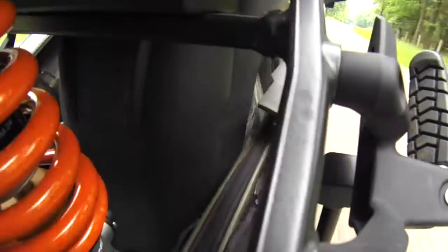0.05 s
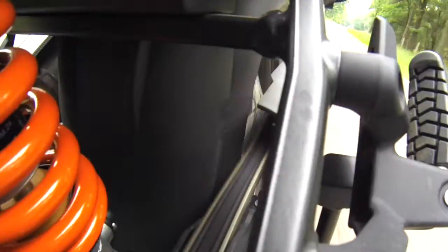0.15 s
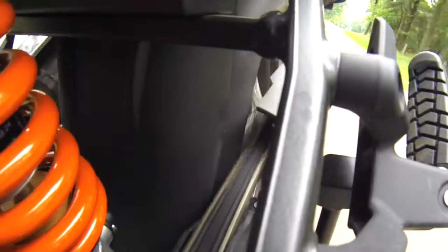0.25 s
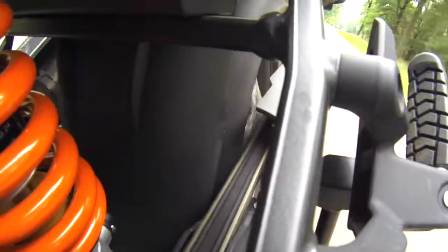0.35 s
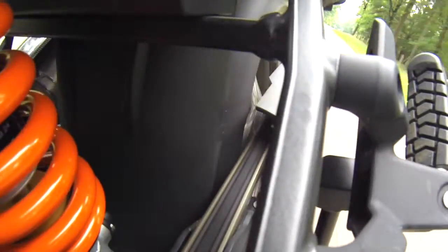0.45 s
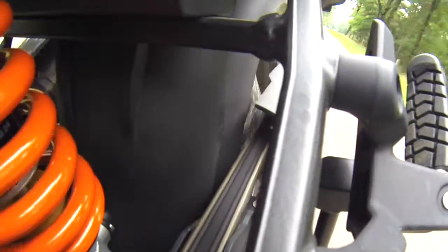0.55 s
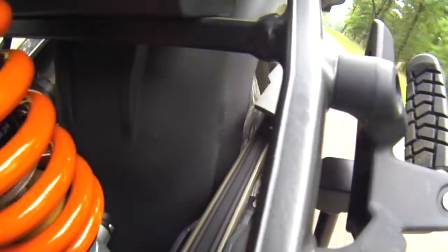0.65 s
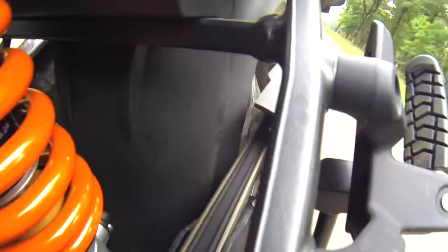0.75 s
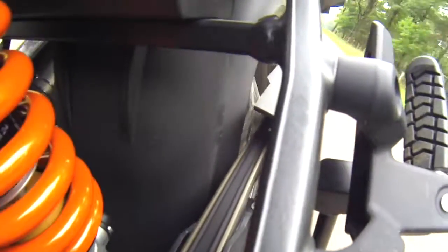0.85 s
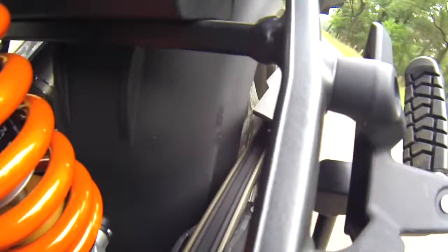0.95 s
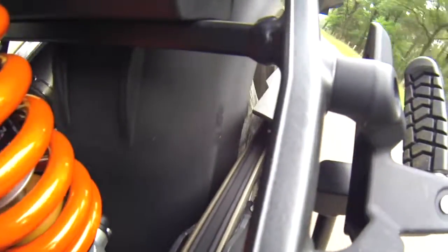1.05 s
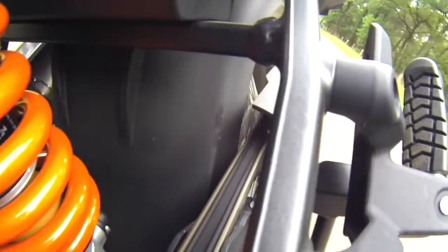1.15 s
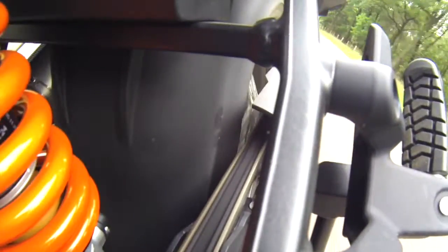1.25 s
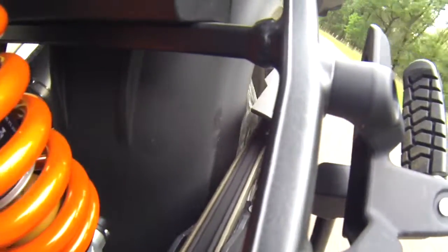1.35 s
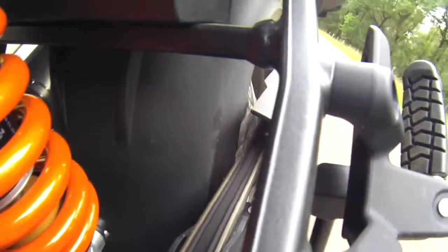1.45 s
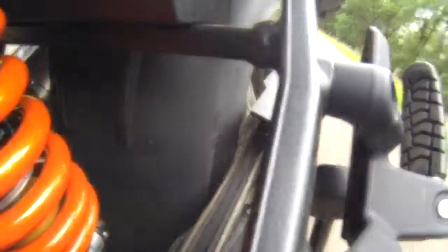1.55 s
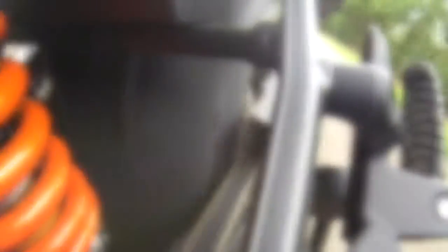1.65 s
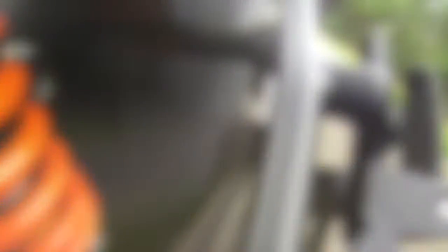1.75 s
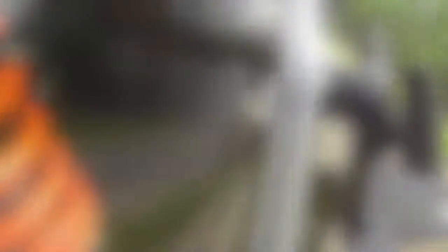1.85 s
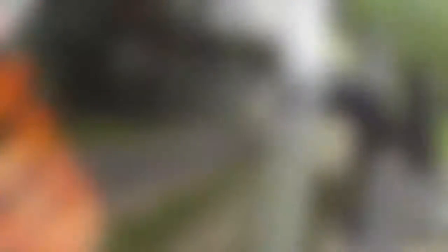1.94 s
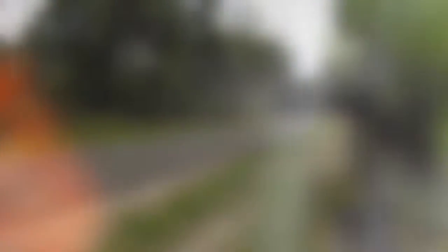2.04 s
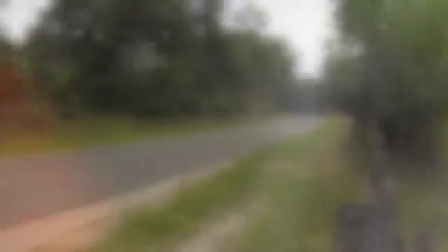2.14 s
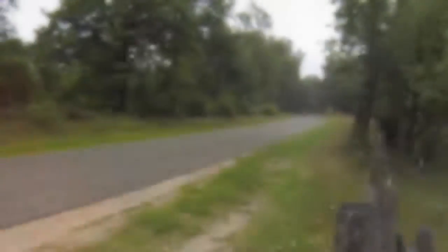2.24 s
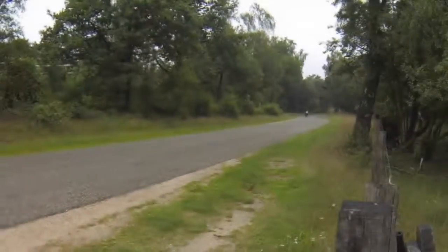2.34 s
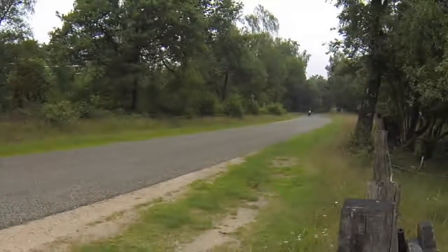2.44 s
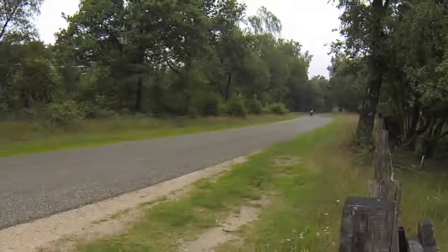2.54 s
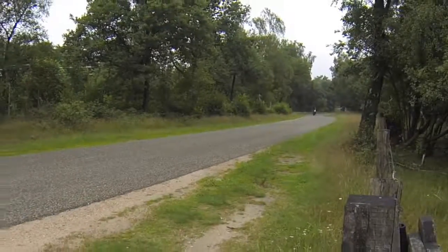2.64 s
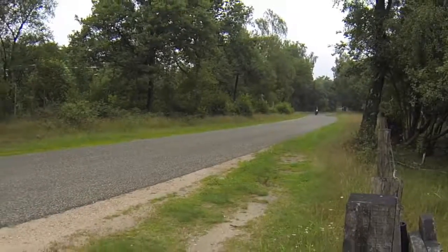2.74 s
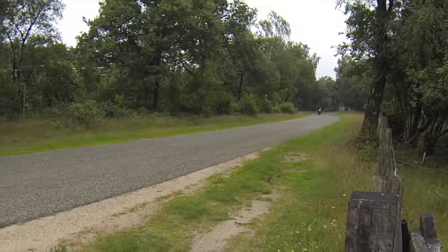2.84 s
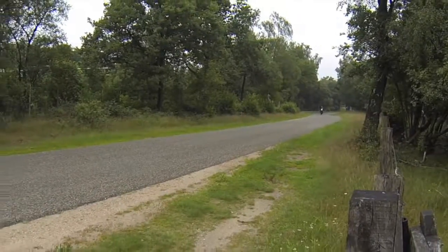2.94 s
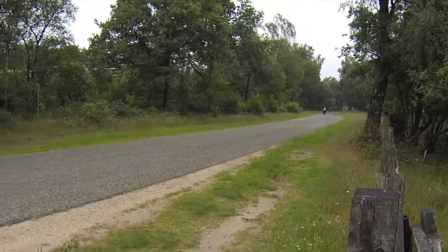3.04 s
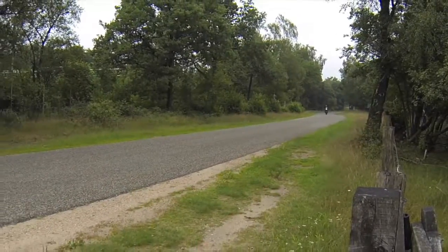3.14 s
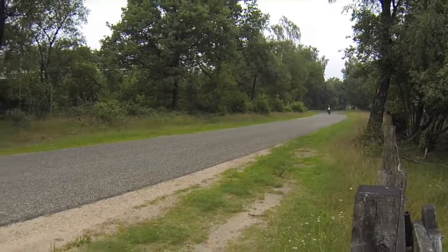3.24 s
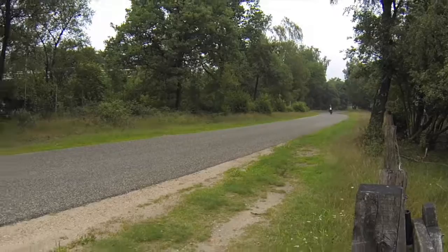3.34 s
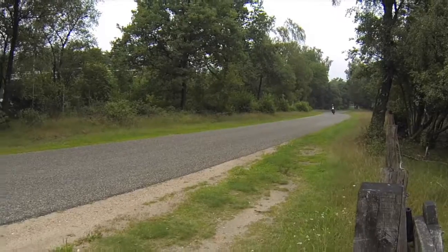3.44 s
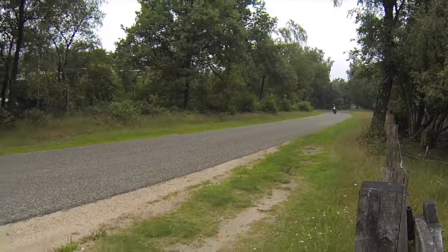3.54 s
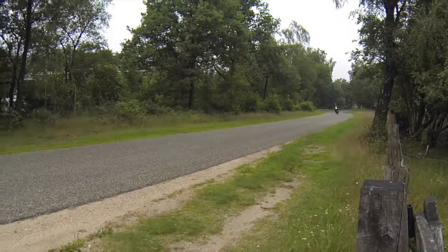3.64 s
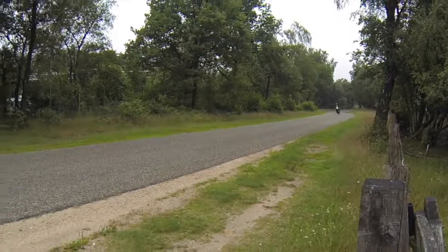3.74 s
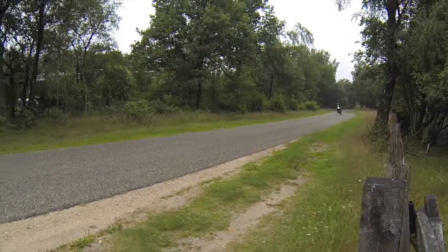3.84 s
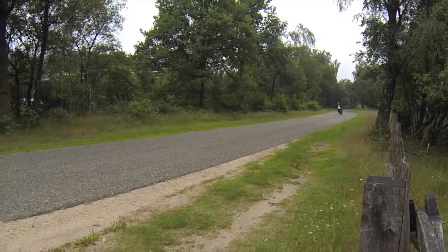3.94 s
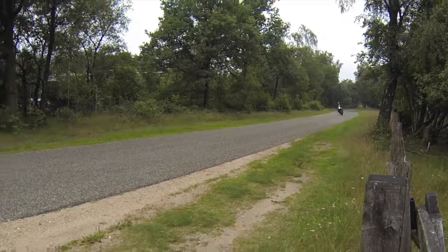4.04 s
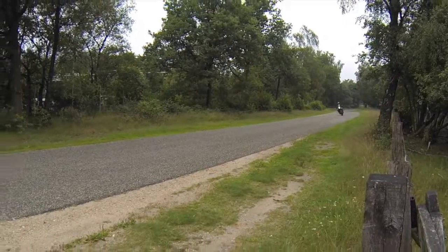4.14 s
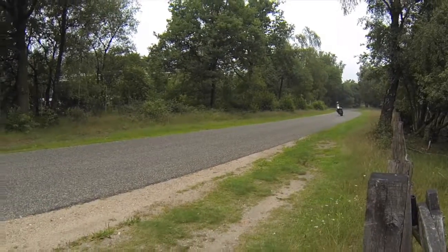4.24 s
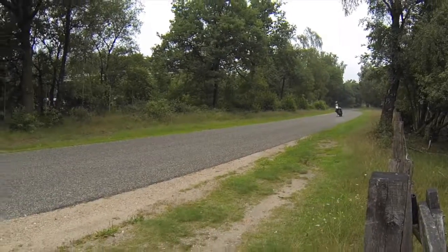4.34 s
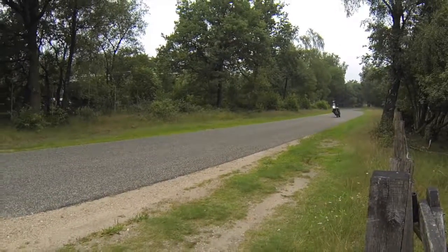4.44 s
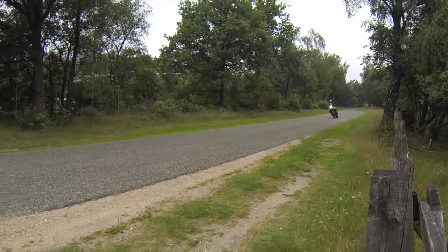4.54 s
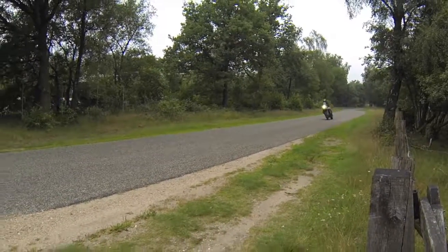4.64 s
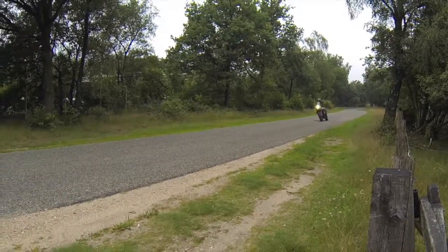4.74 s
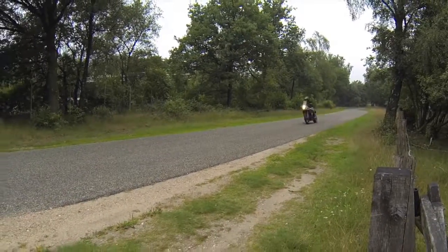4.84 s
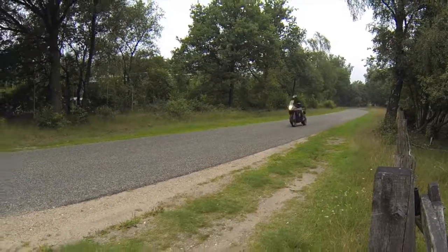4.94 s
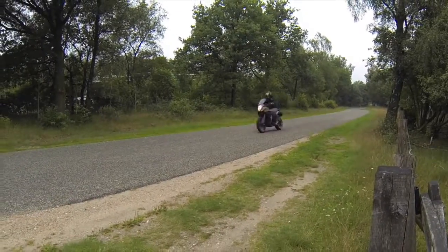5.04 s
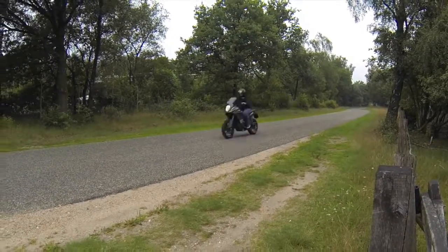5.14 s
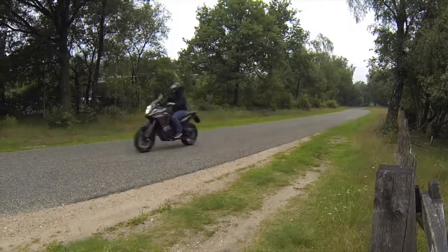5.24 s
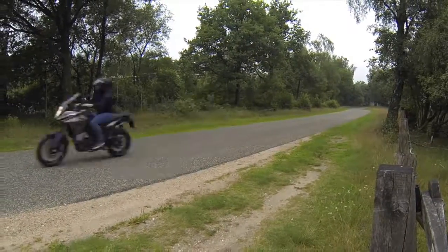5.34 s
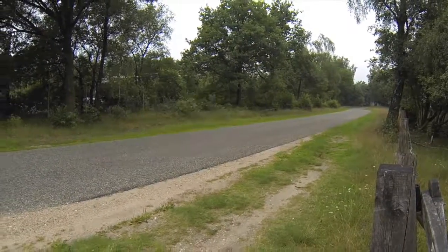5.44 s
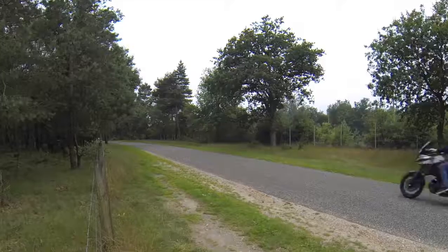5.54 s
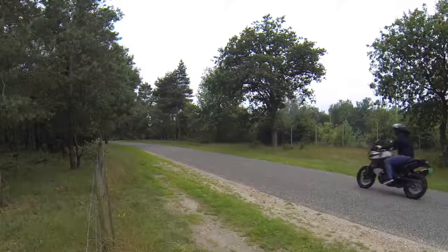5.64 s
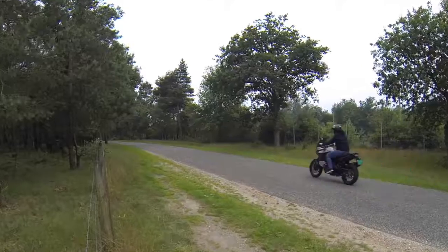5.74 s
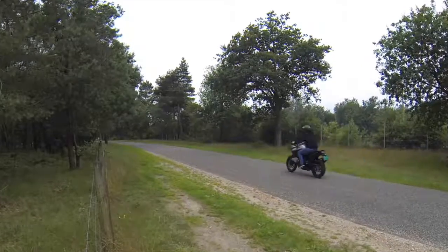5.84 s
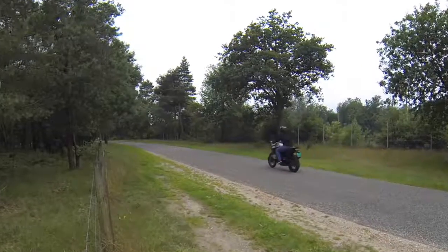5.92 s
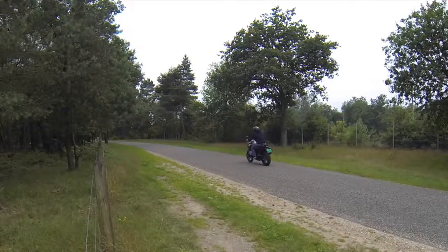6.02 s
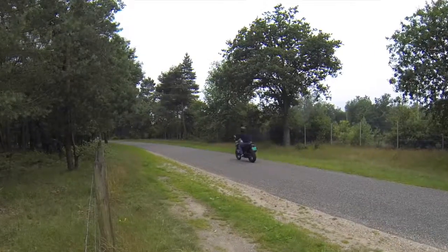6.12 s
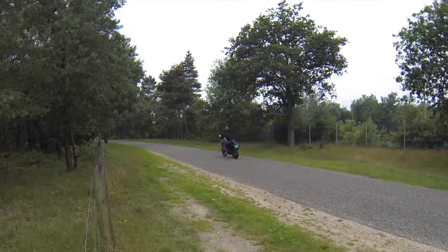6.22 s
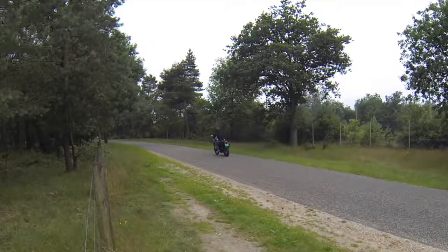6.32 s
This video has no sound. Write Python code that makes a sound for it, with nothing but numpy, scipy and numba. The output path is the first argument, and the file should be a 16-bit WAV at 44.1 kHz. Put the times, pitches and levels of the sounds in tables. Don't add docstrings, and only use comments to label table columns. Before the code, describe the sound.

A motorcycle throbs roughly close by, fades under brief bird whistles, then roars past on a road and recedes in even pulses.

```python
import sys
import numpy as np
from scipy import signal
from scipy.fft import rfft, irfft
from scipy.io import wavfile
from scipy.ndimage import uniform_filter1d, map_coordinates
from numba import njit

SR = 44100
rng = np.random.default_rng(int(sys.argv[2]) if len(sys.argv) > 2 else 0)


def waveform_to_disk(signal):
    frames = np.transpose(np.atleast_2d(signal))
    scaled = np.clip(frames, -1, 1) * 32767
    samples = np.round(scaled).astype(np.int16)
    wavfile.write(sys.argv[1], SR, samples)


def field_ratio(decibels):
    return 10 ** (np.asarray(decibels, dtype=float) / 20)


N = 281358
TIME = np.arange(N) / SR


def curve(table):
    s, *columns = np.transpose(table)
    return [np.interp(TIME, s, c) for c in columns]


def ramp(start_s, end_s):
    return np.clip((TIME - start_s) / (end_s - start_s), 0, 1)


def unit(x):
    return x / np.sqrt(np.mean(x ** 2))


def noise(colour, source=None):
    hz, db = np.transpose(colour)
    bins_hz = np.arange(1, N // 2 + 2) * SR / N
    gain = field_ratio(np.interp(np.log(bins_hz), np.log(hz), db, left=-90, right=-90))
    white = rng.standard_normal(N) if source is None else source
    return unit(irfft(rfft(white) * gain, N))


def walk(rate_hz):
    hold = int(SR / rate_hz)
    steps = np.repeat(rng.standard_normal(N // hold + 1), hold)
    return uniform_filter1d(uniform_filter1d(steps, hold), hold)[:N]


@njit
def svf(x, hz, width_hz):
    y, band, low = np.empty(len(x)), 0., 0.
    for i in range(len(x)):
        g, k = np.tan(np.pi * hz[i] / SR), width_hz / hz[i]
        v = (band + g * (x[i] - low)) / (1 + g * (g + k))
        band, low, y[i] = 2 * v - band, low + 2 * g * v, k * v
    return y


def resonance(x, hz, width_hz):
    return svf(x, np.full(len(x), 1. * hz), 1. * width_hz)


def highpass(x, hz):
    return signal.sosfilt(signal.butter(2, hz, "high", fs=SR, output="sos"), x)


def distance_db(abreast_s):
    speed_m_s, kerb_m = 29.95, 6.43
    return -20 * np.log10(np.hypot(speed_m_s * (TIME - abreast_s), kerb_m) / kerb_m)


def layer_db(layers, near_db):
    return [10 * np.log10(field_ratio(db + pace * near_db) ** 2 + field_ratio(wash_db) ** 2) for db, pace, wash_db in layers]


def bumps_db(rows):
    return sum(db * np.exp(-((TIME - s) / length_s) ** 2) for s, db, length_s in rows)


def bird():
    # (time [s], length [s], from [Hz], to [Hz], level [dB])
    notes_sung = [
        (2.338, 0.048, 3310, 2880, -46),
        (2.398, 0.048, 2870, 3180, -47.5),
        (2.44, .06, 3170, 3150, -61),
        (2.528, .012, 4850, 4350, -55),
        (2.552, 0.033, 4080, 3460, -47),
        (2.578, .03, 3500, 3210, -52),
        (2.609, 0.028, 3340, 3265, -47),
        (2.63, .035, 3360, 3420, -57),
    ]
    out = np.zeros(N)
    for s, length_s, from_hz, to_hz, db in notes_sung:
        along = ramp(s, s + length_s)
        swell = np.abs(np.sin(np.pi * along)) ** 0.67 * (along < 1)
        phase = 2 * np.pi * np.cumsum(from_hz + (to_hz - from_hz) * along) / SR
        out += np.sqrt(2) * field_ratio(db) * swell * np.sin(phase)
    tail = rng.standard_normal(SR // 6) * np.exp(-TIME[:SR // 6] / 0.063)
    return out + field_ratio(-33) * signal.fftconvolve(out, tail)[:N]


def ticks():
    # (time [s], peak level [dB], centre [Hz])
    strikes = [(5.1971, -32, 8660), (5.2294, -33, 8680), (5.2515, -30, 8600), (5.2764, -33, 8550),
               (5.3218, -26, 9450), (5.3457, -24, 8970), (5.3931, -24, 9830), (5.433, -22, 8550),
               (5.441, -25, 9570), (5.4644, -28, 8620), (5.5039, -38, 9670), (5.5154, -34, 9180),
               (5.5394, -35, 9140), (5.5844, -35, 8910), (5.6431, -34, 9430)]
    out, t = np.zeros(N), TIME[:300]
    for s, db, hz in strikes:
        grain = rng.standard_normal(300) * t * np.exp(-t / 0.0014)
        burst = resonance(resonance(grain, hz, 4000), hz, 4000)
        start = int(s * SR)
        out[start:start + 300] += field_ratio(db) * burst / np.abs(burst).max()
    return out


def clatter(turns, repeat, life):
    pattern = rng.standard_normal((300, 1024))
    age, place = turns / life % 299, (turns % 1 * 1024).astype(int)
    row, blend = age.astype(int), np.pi / 2 * (age % 1)
    same = np.cos(blend) * pattern[row, place] + np.sin(blend) * pattern[row + 1, place]
    return np.sqrt(repeat) * same + np.sqrt(1 - repeat) * rng.standard_normal(N)


def pipe_wave(orders, second, gap, lean, bass_lag, size=2048):
    k, db = np.transpose(orders)
    lines = np.arange(size // 2 + 1)
    roll_db = db[-1] - 40 * np.log2(np.maximum(lines / k[-1], 1))
    line_db = np.where(lines > k[-1], roll_db, np.interp(lines, k, db))
    log_gain = np.log(field_ratio(line_db) + 1e-6)
    cepstrum = irfft(log_gain)
    cepstrum[1:size // 2] *= 2
    cepstrum[size // 4:] = 0
    pair = np.angle(1 + second * np.exp(-2j * np.pi * lines * gap))
    pair = pair - 2 * np.pi * lines * bass_lag * (lines < 3)
    phase = rfft(cepstrum).imag + pair + lean
    return unit(-irfft(np.exp(log_gain + 1j * phase) * (lines > 0)))


def engine(revs, levels, pipes, turn_s, roar, hiss, second, lean, jitter, scatter_db, gate, start, repeat,
           flicker_db, bass_lag=0):
    # (frequency [Hz], level [dB per Hz])
    rumble = [(15, -21), (30, 3), (80, 4.5), (160, -3.5), (300, -7), (450, -25.5)]
    exhaust_db, rumble_db, roar_db, hiss_db = levels
    even = np.cumsum(curve(revs)[0]) / SR
    even = even - even[int(revs[0][0] * SR)] + start
    turns = even + jitter * walk(30)
    strength = np.interp(turns, np.arange(400) + 0.75, field_ratio(scatter_db * rng.standard_normal(400)))

    waves = np.array([pipe_wave(p, second, gap=.6, lean=lean, bass_lag=bass_lag) for p in pipes])
    voice = np.interp(TIME, turn_s, range(len(pipes)))
    exhaust = map_coordinates(waves, [voice, turns % 1 * 2048], order=1, mode="grid-wrap")

    puff = unit(np.exp(gate * strength * np.cos(2 * np.pi * (turns - .15))))
    rattle = puff * clatter(even, repeat, life=6.034)
    low = field_ratio(exhaust_db) * strength * exhaust + field_ratio(rumble_db + 1.13 * walk(10)) * noise(rumble)
    mid = field_ratio(roar_db + 0.38 * walk(12)) * noise(roar, rattle)
    high = field_ratio(hiss_db + 0.067 * walk(5)) * noise(hiss, rattle)
    high = high + (field_ratio(flicker_db * walk(35)) - 1) * highpass(high, 7000)
    return low, mid, high, rattle


def on_frame():
    # (time [s], cycle rate [Hz])
    revs = [
        (0, 40.11),
        (1.1, 40.9),
        (1.8, 41.06),
    ]
    # (closest level [dB], loss [dB per dB of distance], far wash [dB])
    layers = [
        (-34, -0.1, -70),
        (-32, 0.23, -70),
        (-34, 0.87, -70),
        (-42.5, 0.4, -72),
    ]
    # (time [s], level [dB], length [s])
    jolts = [(.1, 1.4, 0.13), (0.228, 1, .04), (.34, -2, .06), (0.463, -3.5, 0.047), (.7, 2.5, .07),
             (0.82, -4.5, 0.067), (1.004, 3, 0.13), (1.123, -5, 0.048), (1.173, 6, 0.0087),
             (1.29, 1, 0.056), (1.55, 2, 0.11), (1.8, 2.5, 0.083), (1.95, 3, 0.064)]
    # (multiple of cycle rate, level [dB])
    pipes = [
        [(1, 1.5), (2, -9.5), (3, -6.5), (4, -0.5), (5, -4), (6, -5.5), (7, -8), (8, -6.5), (9, -7), (10, -8.5),
         (11, -9), (12, -6.5), (13, -21), (14, -25)],
        [(1, 1.5), (2, -11), (3, -3), (4, 0), (5, -3.5), (6, -10), (7, -7), (8, -7.5), (9, -7.5), (10, -14),
         (11, -17), (12, -7.5), (13, -32), (14, -11)],
    ]
    # (frequency [Hz], level [dB per Hz])
    roar = [(180, -47), (300, -30), (365, -7.5), (598, -9.5), (716, 0), (753, 0.5), (820, -8.5),
            (1370, -11.5), (1690, -9), (2300, -46), (2990, -61), (5060, -120)]
    hiss = [(1180, -31.5), (2000, -3.5), (2160, -6.5), (2690, -7.5), (3080, 0), (3490, 0.5), (3730, 0.5),
            (4060, -11), (4270, -3), (4770, -0.5), (5190, -6), (6140, -7.5), (8910, -15), (11100, -24.5),
            (15000, -60)]
    # (centre [Hz], width [Hz], level [dB])
    fairing = [(696, 64, 4), (1730, 150, -3)]
    # (multiple of cycle rate, level [dB])
    tones = [(16, -6), (17, -1.5), (18, 0.5), (19, -6.5), (41, -13.5), (42, -17), (43, -10)]
    levels = layer_db(layers, bumps_db(jolts))
    low, mid, high, rattle = engine(
        revs, levels, pipes, [.6, 1.1], roar, hiss, second=0.74, lean=0.69, jitter=0.017,
        scatter_db=3.0, gate=0.13, start=.3, repeat=0.23, flicker_db=4.0)
    ring = sum(field_ratio(db) * unit(resonance(rattle, hz, width_hz)) for hz, width_hz, db in fairing)
    turns = np.cumsum(curve(revs)[0]) / SR + 0.0044 * walk(7.95)
    lines = sum(field_ratio(db + 2.24 * walk(14.32)) * np.sin(2 * np.pi * (k * turns + rng.random()))
                for k, db in tones)
    body = field_ratio(levels[2]) * (field_ratio(-12) * ring + field_ratio(-1.5) * lines)
    return low + field_ratio(-1) * mid + high + body


def nearing():
    # (time [s], cycle rate [Hz])
    revs = [
        (2.2, 43.6),
        (3.3, 43.79),
        (3.83, 44.33),
        (4.43, 44.91),
        (4.91, 44.88),
        (5.17, 43.68),
        (5.35, 42.7),
        (5.55, 39.52),
    ]
    # (closest level [dB], loss [dB per dB of distance], far wash [dB])
    layers = [
        (-10.5, 1.115, -34),
        (-22.5, 0.77, -31.5),
        (-18, 1.07, -34.5),
        (-24.5, 1.518, -60.5),
    ]
    # (multiple of cycle rate, level [dB])
    pipes = [
        [(1, -3.5), (2, 4), (3, -3.5), (4, -16), (5, -15), (6, -11.5), (7, -14), (8, -18), (9, -33), (10, -30),
         (11, -16), (12, -22)],
        [(1, -8.5), (2, -0.5), (3, -3.5), (4, -9.5), (5, -13), (6, -5), (7, -16), (8, -9.5), (9, -35),
         (10, -18.5), (11, -13), (12, -20)],
        [(1, -2), (2, 1.5), (3, -2.5), (4, -1), (5, -3), (6, -3.5), (7, -6), (8, -8), (9, -26.5), (10, -14),
         (11, -13), (12, -14)],
    ]
    # (frequency [Hz], level [dB per Hz])
    roar = [(180, -48), (300, -6), (393, -9), (530, -8.5), (602, -4), (825, -8.5), (962, -8.5),
            (1530, -15.5), (1950, -23), (2600, -35), (3380, -41), (5720, -120)]
    hiss = [(1120, -33), (1900, -44), (2160, -9), (2930, -2), (3480, -2), (4030, -3.5), (4960, -5.5),
            (6780, -10.5), (7720, -10.5), (9920, -21), (11600, -29), (13500, -36), (15000, -48)]
    # (centre [Hz], width [Hz], level [dB], how far the flank must face the verge [power])
    tank = [(646, 130, -4.5, 0.0017), (934, 47, -5, 2.2)]
    # (time [s], level [dB], length [s])
    swells = [
        (4.66, 0.5, 0.052),
        (5.02, 1.5, .04),
        (5.2, 1, 0.051),
        (5.3, -2.5, 0.099),
        (5.42, 0.5, 0.056),
    ]
    near_db = distance_db(abreast_s=5.344)
    swing = ramp(5.1, 5.555)
    low, mid, high, _ = engine(
        revs, layer_db(layers, near_db), pipes, [2.6, 3.6, 5.0], roar, hiss, second=1.0, lean=0.72,
        jitter=0.019, scatter_db=1.0, gate=0.057, start=.3, repeat=0.16, flicker_db=1.6)
    clear = np.clip(1.43 + near_db / 12.5, 0.32, 1)
    high = high * field_ratio(-3.5 * swing ** 7.4)
    mid = mid + sum(field_ratio(db) * swing ** facing * resonance(mid, hz, width_hz)
                    for hz, width_hz, db, facing in tank)
    swell_db = bumps_db(swells)
    mid, high = mid * field_ratio(swell_db), high * field_ratio(0.23 * swell_db)
    road = mid + 1.3 * swing * resonance(mid, 1500, 560) + high
    upper_hz, lower_hz = 4150 + 2300 * swing ** 8.0, 1700 + 900 * swing ** 2.2
    depth = np.clip(.45 + .15 * clear + .35 * swing + .15 * walk(25), 0, .85)
    road = road - depth * svf(road, upper_hz, 700.) - (depth - .4 * swing) * svf(road, lower_hz, 800.)
    return low + road - highpass(road, 6000) * (1 - clear)


def leaving():
    # (time [s], cycle rate [Hz])
    revs = [
        (5.56, 38.06),
        (5.848, 37.63),
        (6.156, 37.83),
        (6.38, 38.08),
    ]
    # (closest level [dB], loss [dB per dB of distance], far wash [dB])
    layers = [
        (-11, 0.32, -60),
        (-24, 0.36, -64),
        (-23, 0.61, -60),
        (-27, 1.09, -53),
    ]
    # (multiple of cycle rate, level [dB])
    pipes = [
        [(1, -0.5), (2, 2), (3, -15), (4, -7), (5, -1), (6, -1), (7, -6.5), (8, -4), (9, -12), (10, -15),
         (11, -18), (12, -17), (13, -15), (14, -24), (15, -29), (16, -15)],
        [(1, -2), (2, 0.5), (3, -17), (4, 0), (5, 2.5), (6, -1), (7, 3), (8, 1), (9, -8), (10, -5.5),
         (11, -13.5), (12, -5.5), (13, -3), (14, -28), (15, -14.5), (16, -19.5)],
    ]
    # (frequency [Hz], level [dB per Hz])
    roar = [(210, -58), (350, -38.5), (420, -11.5), (495, -5.5), (523, -7.5), (570, -5.5), (711, -13.5),
            (1920, -32), (2300, -38), (2990, -52), (5060, -120)]
    hiss = [(1120, -32), (1900, -33), (2220, -11), (2900, 0.5), (3860, -4), (4250, -9), (4590, -4),
            (5700, -7), (8490, -15), (9840, -23.5), (12400, -32.5), (15000, -41)]
    low, mid, high, _ = engine(
        revs, layer_db(layers, distance_db(abreast_s=5.565)), pipes, [5.65, 5.95], roar, hiss, second=.25,
        lean=1.15, jitter=.003, scatter_db=.8, gate=.2, start=.63, repeat=.15, flicker_db=1.2, bass_lag=.55)
    echo = field_ratio(1.5) * ramp(5.65, 5.76) * resonance(mid, 1450, 420)
    return low + mid + high + echo


def scene():
    cut_s, cut_length_s, carry_over = 5.545, .01, .08
    cut = ramp(cut_s, cut_s + cut_length_s)
    frame = np.cos(np.pi / 2 * ramp(1.36, 2.36)) ** 1.17
    verge = np.sin(np.pi / 2 * ramp(1.69, 2.57)) * (1 - (1 - carry_over) * cut)
    bike = frame * on_frame() + verge * nearing() + cut * leaving()
    return (bird() + ticks() + bike)[None]


def top_cut(x):
    return signal.sosfilt(signal.butter(12, 15180, fs=SR, output="sos"), x)


def record(dry):
    # (frequency [Hz], level [dB per Hz])
    circuit_hiss = [(5000, -12), (9000, -5), (13000, 1), (15200, -8)]
    whine = field_ratio(-93 + 3 * walk(20)) * np.sin(2 * np.pi * 11190 * TIME)
    circuit = field_ratio(-85) * noise(circuit_hiss) + whine
    mix = np.tanh(1.135 * (dry + circuit)) / 1.147
    return top_cut(mix)


dry = scene()
out = record(dry)
waveform_to_disk(out)
```